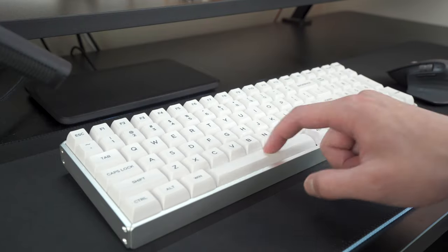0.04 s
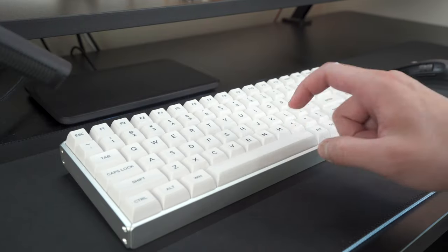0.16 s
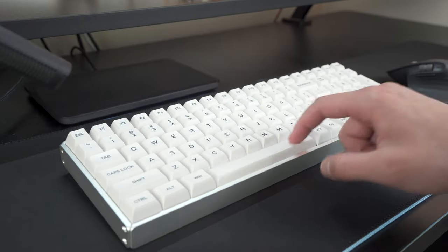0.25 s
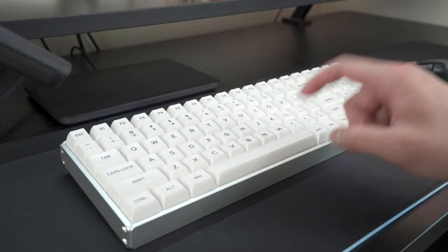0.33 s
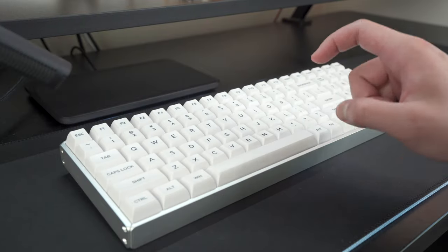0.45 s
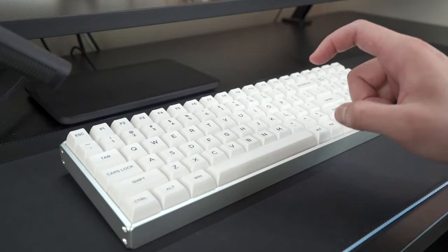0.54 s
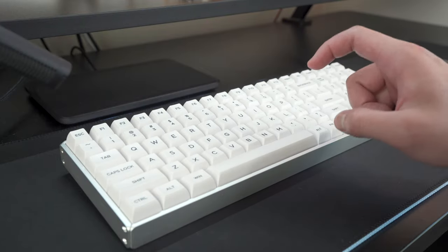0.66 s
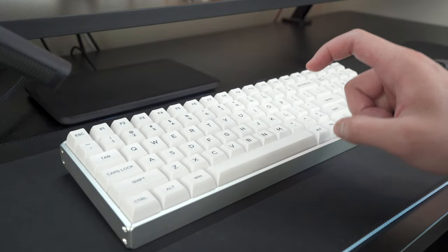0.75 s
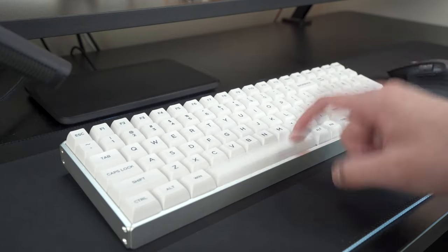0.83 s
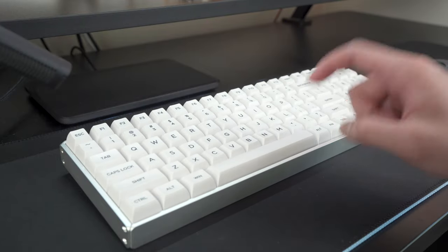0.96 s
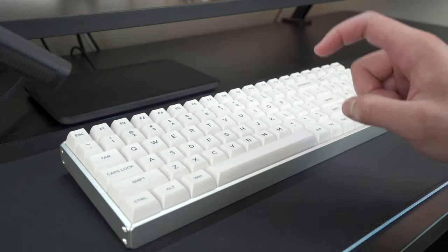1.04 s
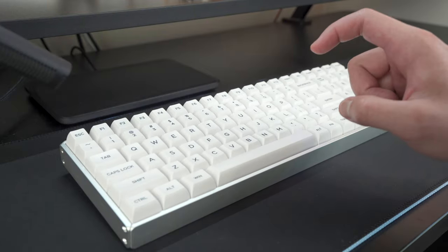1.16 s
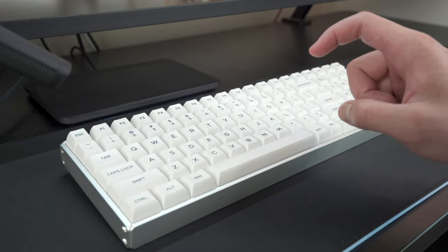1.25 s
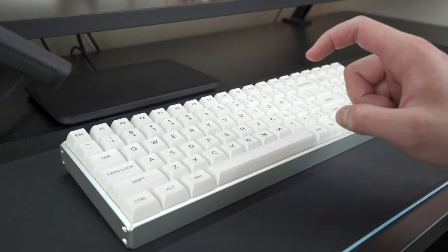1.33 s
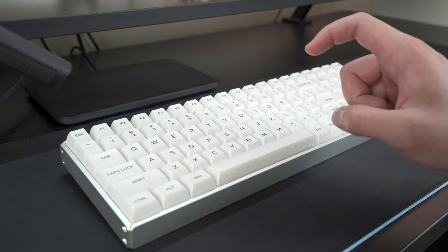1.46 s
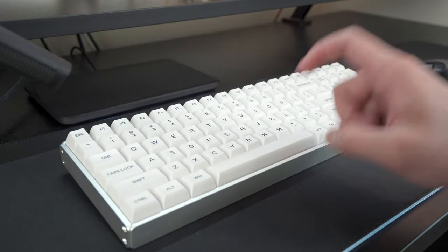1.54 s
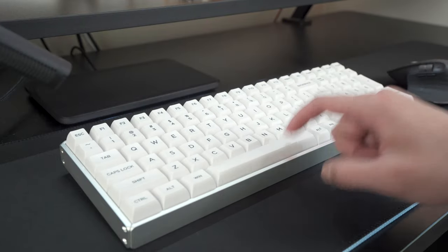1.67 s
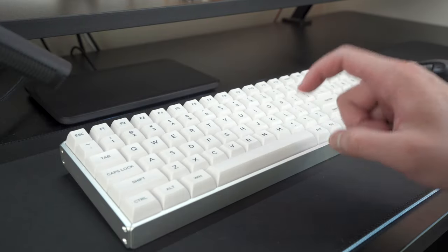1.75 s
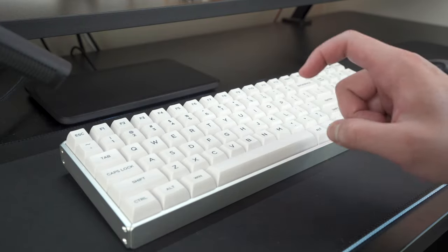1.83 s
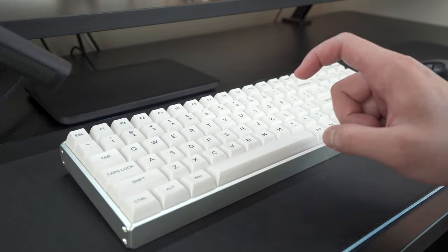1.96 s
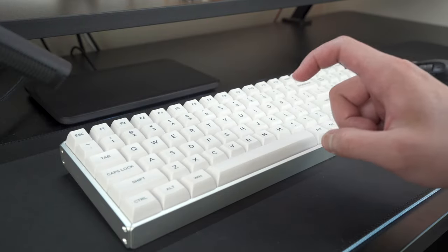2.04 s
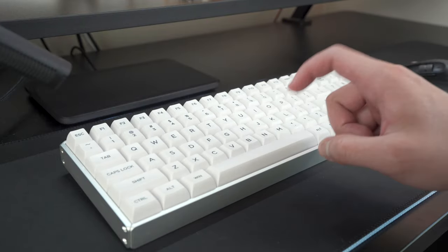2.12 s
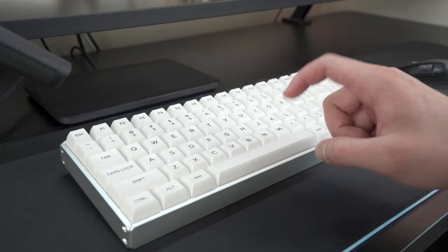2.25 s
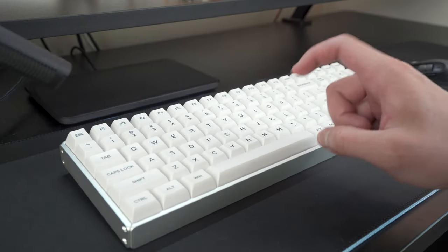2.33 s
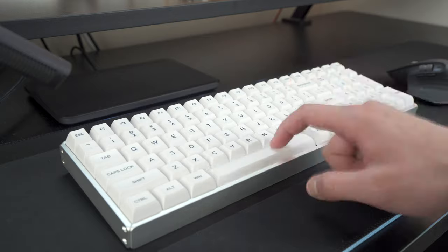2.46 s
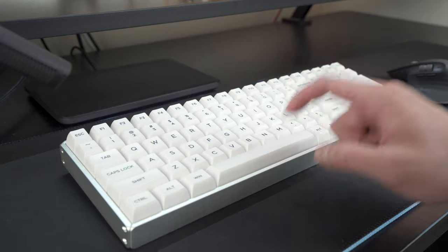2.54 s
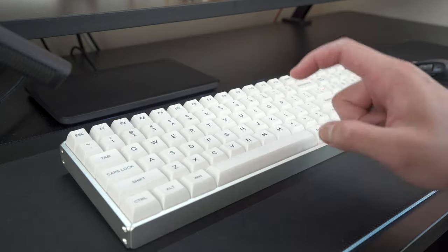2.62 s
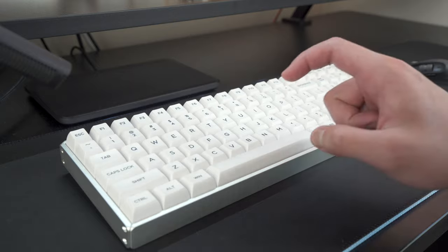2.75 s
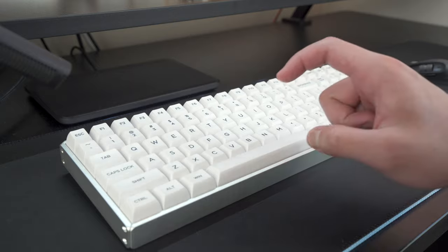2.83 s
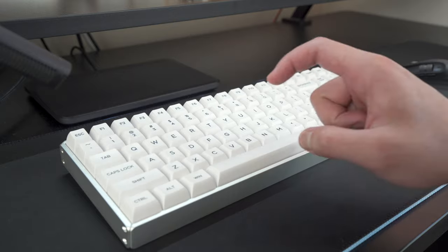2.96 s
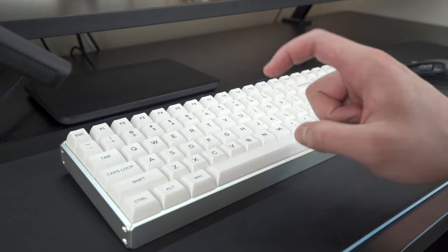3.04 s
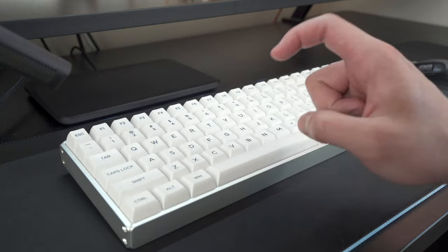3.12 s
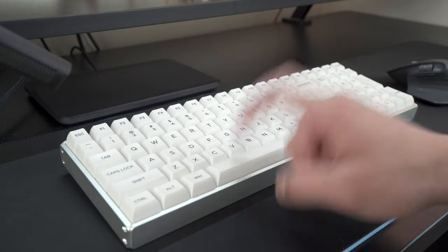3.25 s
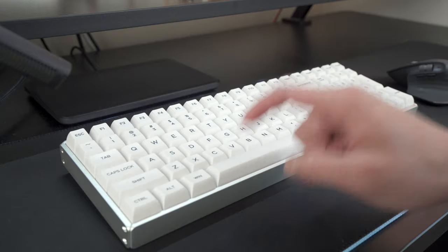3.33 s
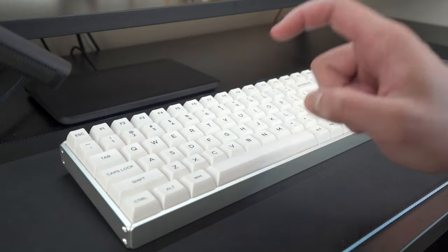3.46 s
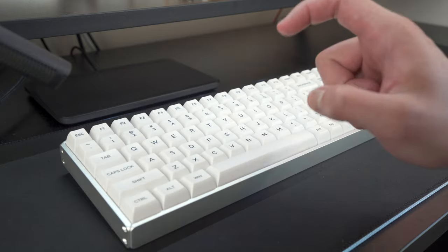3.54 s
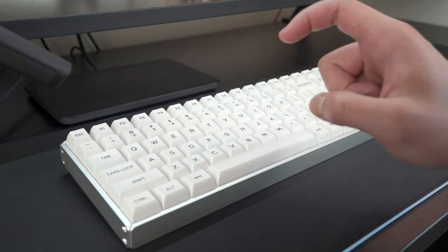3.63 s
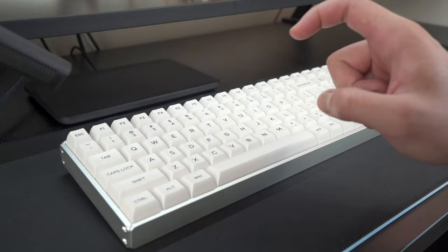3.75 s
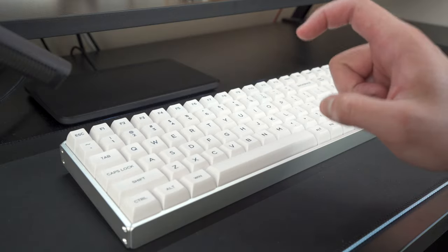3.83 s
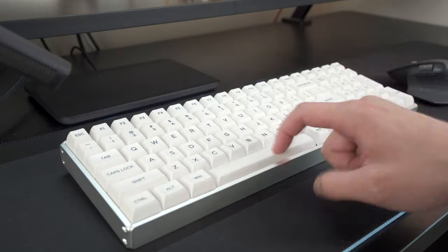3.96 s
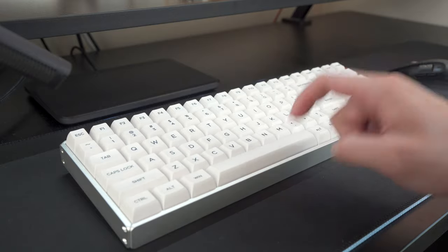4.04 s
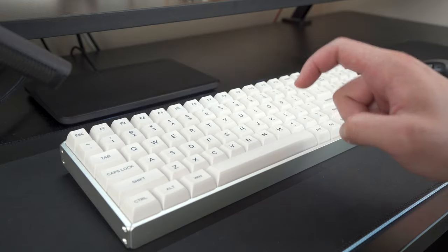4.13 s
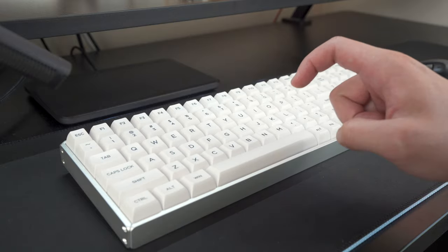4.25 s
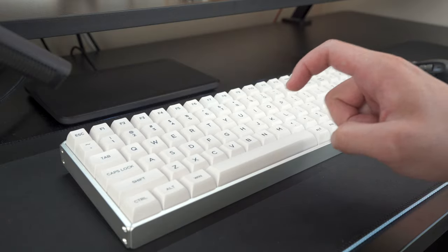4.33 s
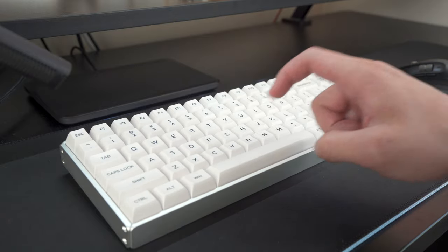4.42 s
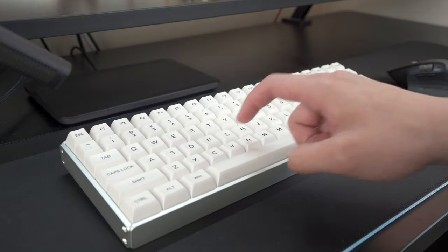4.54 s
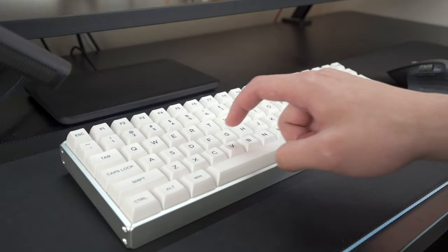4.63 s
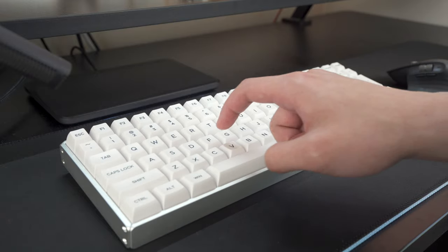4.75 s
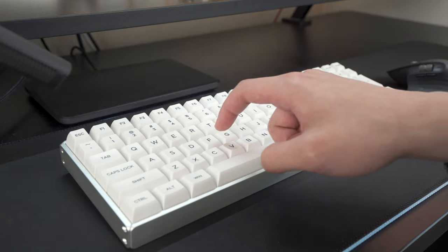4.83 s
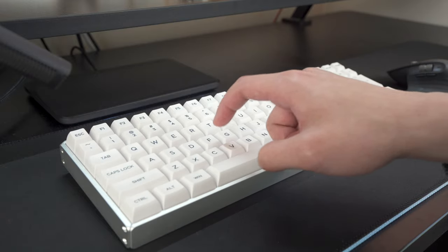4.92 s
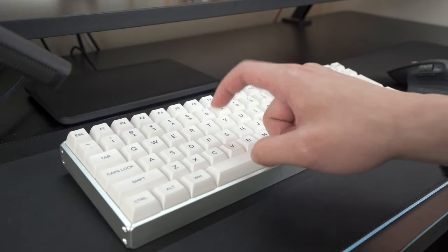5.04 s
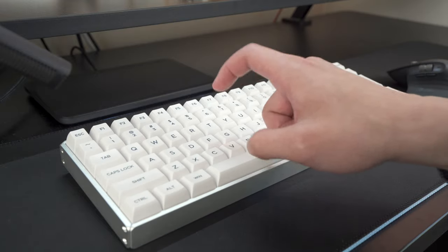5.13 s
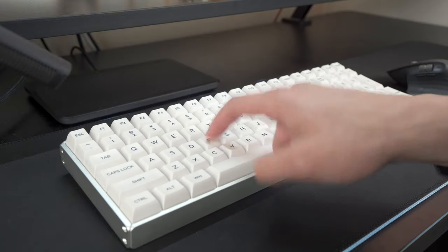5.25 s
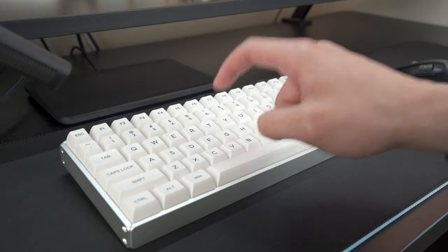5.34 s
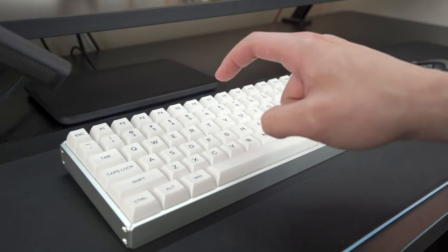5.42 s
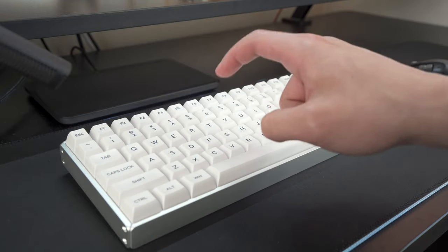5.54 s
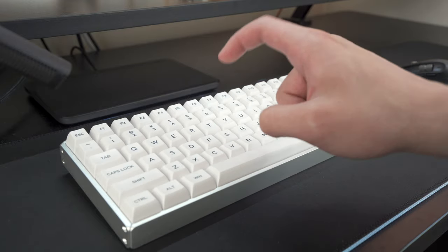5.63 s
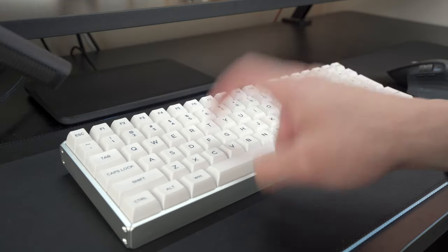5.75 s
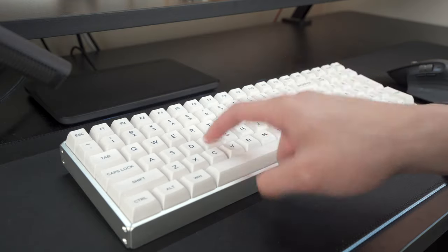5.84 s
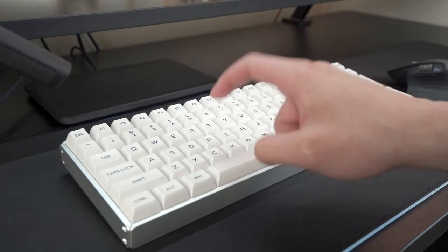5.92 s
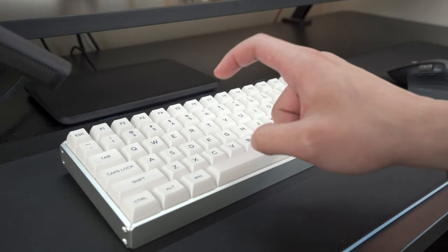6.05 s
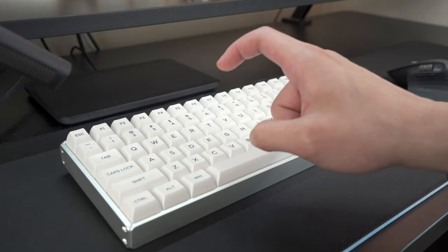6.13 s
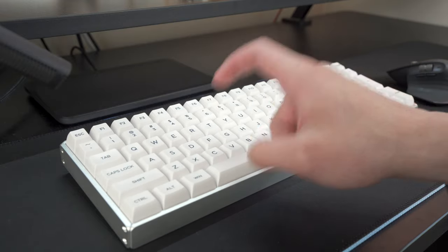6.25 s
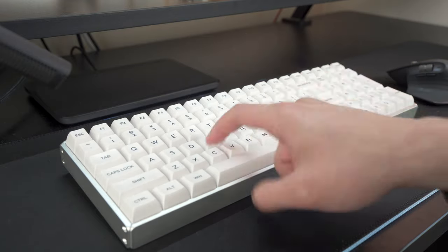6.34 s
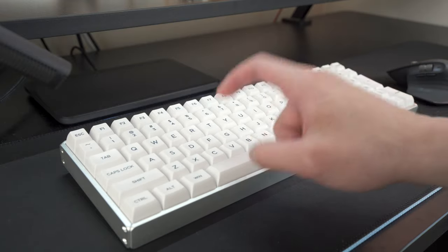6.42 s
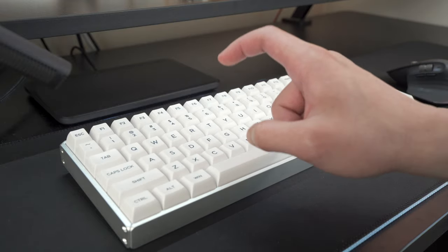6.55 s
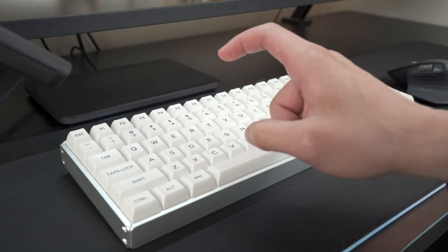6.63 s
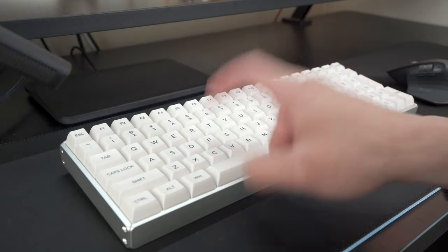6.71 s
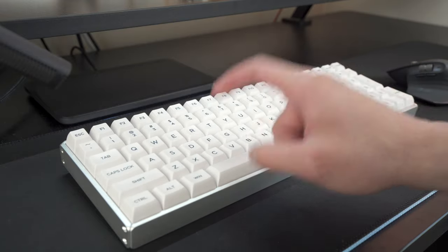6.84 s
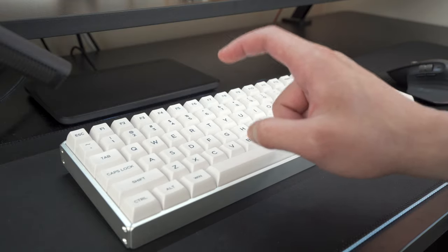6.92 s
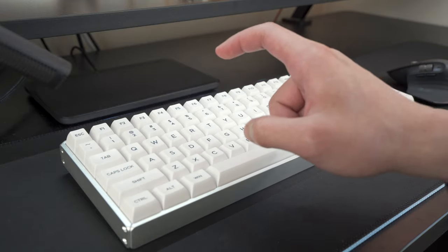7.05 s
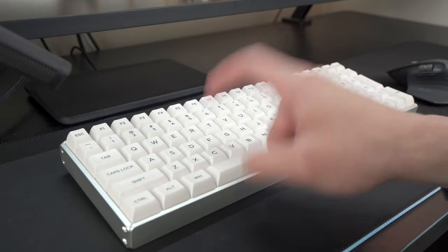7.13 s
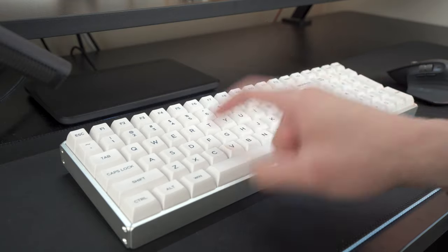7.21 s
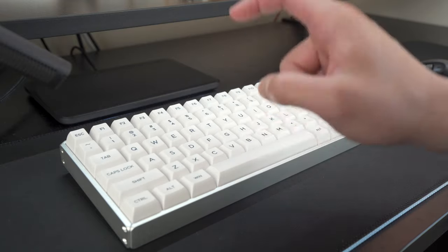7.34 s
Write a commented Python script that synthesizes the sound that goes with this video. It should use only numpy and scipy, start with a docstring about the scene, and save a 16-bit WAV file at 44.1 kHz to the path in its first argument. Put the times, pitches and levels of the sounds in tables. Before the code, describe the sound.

Close to the microphone, a mechanical keyboard's space bar clacks loudly, twice in quick succession and then five more times at a slow, even pace, rattling briefly on each return. After a short gap come five lighter, crisper letter key clicks, each slightly different in pitch. The strokes thud softly through the desk and leave a faint metallic ring over the low air of a small, quiet room.

```python
"""A space bar clacks close to the microphone, again and again; then come five letter keys.
One finger plays a mechanical keyboard on a desk in a small, quiet room. Each stroke is a fingertip tap,
a hard landing that shakes the desk, and a lighter clack as the spring throws the cap back.
Springs and metal case ring faintly over the room air. The loudest landings clip flat at full scale."""
import sys
import numpy as np
from scipy import signal
from scipy.fft import rfft, irfft
from scipy.io import wavfile

SR = 44100
rng = np.random.default_rng(int(sys.argv[2]) if len(sys.argv) > 2 else 0)


def waveform_to_disk(signal):
    """Save audio, clipped to [-1, 1], as 16-bit WAV at the path in sys.argv[1]."""
    frames = np.transpose(np.atleast_2d(signal))
    scaled = np.clip(frames, -1, 1) * 32767
    samples = np.round(scaled).astype(np.int16)
    wavfile.write(sys.argv[1], SR, samples)


N = 325458
LEAD_S = .05  # the first stroke lands just before time zero and is still ringing
SIZE = N + int(LEAD_S * SR)

# Room tone. Each row: frequency in Hz, relative spectral level in dB.
AIR_SPECTRUM = [(25, -5), (75, 0.5), (120, -6.5), (200, -10.5), (570, -12.5), (800, -16), (1700, -16),
                (2500, -19), (3800, -26.5), (4800, -27), (6000, -33), (8000, -40), (10500, -40),
                (15500, -40.5)]
# Faint hum in the room. Each row: centre in Hz, level in dB, width in Hz.
HUM_BANDS = [(80, -64, 13), (548, -69, 14), (594, -73, 14), (1217, -74.5, 14), (1250, -79, 16)]
# The small room's tail. Each row: band centre in Hz, relative level in dB, t60 in seconds.
ROOM_DECAY = [(150, -3.5, 0.42), (600, 6, 0.29), (1740, 1, 0.41), (2130, -4, 0.26), (2700, 0.5, .3),
              (5000, -6, 0.35), (9000, -6, .26), (14000, -3.5, 0.19)]

# Low thuds of desk and fingertip, long rings of metal case and springs.
# Each row: frequency in Hz, relative level in dB, t60 in seconds.
DESK_MODES = [(53.7, -16.5, 0.18), (43.5, -28, 0.63), (81.5, -30.5, 0.12), (144, -44, 0.087)]
FINGER_PAD_MODES = [(123, -22.5, 0.027), (201, -33.5, 0.027)]
CASE_MODES = [(560, -56.5, 1.6), (1215, -64, 4), (1730, -51, 1.1), (1860, -60.5, 1.2), (2250, -64, 0.67),
              (4500, -68, 0.91)]
SPACE_SPRING_MODES = [(266, -36.5, 0.43), (588, -48.5, 1.5), (1613, -52, 1.4), (1670, -52, .6)]
KEY_SPRING_MODES = [(8100, -57, .3), (8600, -58, .28), (9345, -54, 0.28), (9620, -57, .32)]

# Clear modes of the long cap and of a small cap in the plate.
# Each row: frequency in Hz, relative level in dB on landing, the same on return, t60 in seconds.
SPACE_CAP_MODES = [(491, -9.5, -20.5, 0.042), (621.8, -15, -27.5, .045), (1142, -22, -28, 0.062),
                   (1364, -14.5, -20.5, 0.039), (1550, -16, -25, 0.046), (1630, -22, -25.5, 0.044),
                   (1928, -3.5, -27, 0.036), (2064, -7.5, -16, 0.054), (2142, -24, -13.5, .062),
                   (2830, -14.5, -34.5, 0.051), (4030, -18, -23, 0.034), (4940, -14, -29.5, .03),
                   (7960, -18, -14, .012)]
KEY_CAP_MODES = [(521, -28, -42, 0.064), (718, -24.5, -23.5, 0.026), (1092, -22, -24, 0.052),
                 (1256, -28, -34, .04), (1712, -13, -39, 0.038), (2060, -12.5, -27, 0.027),
                 (4330, -12.5, -34, 0.02), (5025, -3.5, -34, 0.011), (8240, -12, -8.5, 0.011)]
# Crowded modes of each contact, heard as bands of noise.
# Each row: centre in Hz, relative snap level in dB, relative ring level in dB, ring t60 in seconds.
SPACE_LANDING_BANDS = [(130, -28, -26, 0.062), (350, -30.5, -29, 0.034), (900, -26.5, -29.5, 0.062),
                       (1500, -13.5, -12.5, 0.051), (3020, -21, -16, 0.044), (5100, -10, -13, .04),
                       (8560, -11.5, -15, .03), (14000, -14, -17, 0.03)]
SPACE_RETURN_BANDS = [(130, -38, -31.5, 0.2), (350, -30, -37.5, .05), (915, -28.5, -36.5, 0.14),
                      (1500, -22.5, -22, 0.052), (3000, -21.5, -29, 0.071), (5250, -24, -30, 0.042),
                      (8100, -7.5, -15, 0.013), (10350, -9.5, -30.5, .022), (11700, -26, -39.5, 0.021),
                      (15000, -24.5, -35.5, .025)]
KEY_LANDING_BANDS = [(130, -26, -24, 0.06), (350, -25.5, -39.5, 0.055), (880, -26, -24, .05),
                     (1646, -12.5, -14.5, 0.035), (2510, -14, -22.5, 0.061), (3400, -14.5, -30, 0.062),
                     (4890, -2, -19.5, 0.041), (6300, -16, -27, .04), (8200, 2.5, -27, 0.053),
                     (11060, -16.5, -31.5, 0.033), (14500, -12.5, -24, .04)]
KEY_RETURN_BANDS = [(129.8, -44, -36, 0.048), (400, -48.5, -49, 0.055), (840, -33.5, -35, 0.082),
                    (1700, -32, -33, 0.069), (3830, -15, -22.5, 0.025), (6300, -29, -29, 0.046),
                    (8160, -16.5, -42.5, 0.038), (11700, -37, -41, 0.052), (14000, -17.5, -37, .03)]

# The space bar lands. Each row: time in seconds, force in dB, pitch factor.
SPACE_PRESSES = [(-.024, -5.5, 1.18), (0.1828, -5.5, 1.04), (0.7921, 1, 1.014), (1.5534, 1.5, 1.04),
                 (2.4092, 1, 1.0), (3.2276, -2, 1.015), (3.895, 1.5, 0.99)]
# A letter key lands. Each row: time in seconds, force in dB, pitch factor, brightness in dB per octave.
KEY_PRESSES = [(5.1539, -2, 0.99, 1), (5.7275, -1.5, 1.22, -0.26), (6.2645, -7.5, 1.02, 1.5),
               (6.6947, -4.5, 0.93, 0), (7.1177, -6.5, 1.02, .5)]
# The caps spring back. Each row: time in seconds, force in dB.
SPACE_RELEASES = [(.0373, -2), (0.2287, -2), (0.8404, 0.5), (1.6125, 0), (2.456, 1), (3.2509, -1.5),
                  (3.9495, 0), (5.1754, -6.5)]
KEY_RELEASES = [(5.2136, -4), (5.7934, -3.5), (6.3044, -4), (6.7283, -3.5), (7.1421, -5.5)]


def amp(db):
    """Decibels to gain."""
    return 10 ** (np.asarray(db) / 20)


def unit(x):
    """Scales to an rms of one."""
    return x / np.sqrt(np.mean(x ** 2) + 1e-20)


def add(mix, s, sound):
    """Mixes a sound in at s seconds."""
    part = mix[int(round((s + LEAD_S) * SR)):][:len(sound)]
    part += sound[:len(part)]


def bands(x, rows):
    """Splits a sound into overlapping bands around each row's centre frequency."""
    log_hz = np.log(np.fft.rfftfreq(len(x), 1 / SR) + 1)
    log_centres = np.log([row[0] for row in rows])
    return [irfft(rfft(x) * np.interp(log_hz, log_centres, pick), len(x)) for pick in np.eye(len(rows))]


def fade(t, t60):
    """Falls by 60 dB in t60 seconds."""
    return np.exp(-np.log(1000) * t / t60)


def burst(noise, envelope):
    """Noise under an envelope, holding exactly the envelope's energy."""
    return unit(noise * envelope) * np.sqrt(np.mean(envelope ** 2))


def ring(modes, size):
    """Struck modes; neighbours start in opposite directions, so the ring takes a moment to swell."""
    t = np.arange(size) / SR
    return sum((-1) ** k * amp(db) * fade(t, t60) * np.sin(2 * np.pi * hz * t)
               for k, (hz, db, t60) in enumerate(modes))


def room_tone(air_db):
    """Steady air behind the keyboard, with narrow bands of noise that make a wavering hum."""
    hz = np.fft.rfftfreq(N, 1 / SR)
    points_hz, points_db = np.transpose(AIR_SPECTRUM)
    air_shape = amp(np.interp(np.log(hz + 1), np.log(points_hz), points_db))
    hum_shape = sum(amp(db) * unit(1 / (1 + (2 * (hz - centre) / width) ** 2))
                    for centre, db, width in HUM_BANDS)
    air = irfft(rfft(rng.standard_normal(N)) * air_shape, N)
    hum = irfft(rfft(rng.standard_normal(N)) * hum_shape, N)
    return amp(air_db) * unit(air) + hum


def reflections(x, wet_db, build_s):
    """The near walls send back dense echoes, each band dying at its own speed."""
    t = np.arange(SR) / SR
    parts = bands(rng.standard_normal(SR), ROOM_DECAY)
    tail = sum(amp(db) * fade(t, t60) * part for part, (_, db, t60) in zip(parts, ROOM_DECAY))
    tail *= 1 - np.exp(-(t / build_s) ** 2)
    return amp(wet_db) * signal.fftconvolve(x, tail / np.linalg.norm(tail))[:SIZE]


def key_springs(spread):
    """Each letter key's spring pings faintly at its own pitch."""
    out = np.zeros(SIZE)
    for s, force_db, _, _ in KEY_PRESSES:
        pitch = 1 + spread * rng.uniform(-1, 1)
        tuned = [(hz * pitch, db, t60) for hz, db, t60 in KEY_SPRING_MODES]
        add(out, s, amp(force_db / 2) * ring(tuned, size=SR))
    return out


def desk_and_case(strokes, case_db, pad_db, spring_modes=()):
    """The finger pad thuds; the landing rocks the desk and rings the case and any spring given."""
    out = np.zeros(SIZE)
    desk, pad = ring(DESK_MODES, 2 * SR), ring(FINGER_PAD_MODES, 2 * SR)
    metal = amp(case_db) * ring(CASE_MODES, 2 * SR) + ring(spring_modes, 2 * SR)
    for s, force_db, _, _, travel_s, thump_db in strokes:
        add(out, s - travel_s, amp(thump_db + pad_db) * pad)
        add(out, s + .003, amp(thump_db) * desk)  # the desk answers 3 ms late
        add(out, s, amp(force_db / 2) * metal)
    return out


def desk_recoil(kick_db, lag_s):
    """The returning space bar jerks the desk the other way, so the thud shudders."""
    out, desk = np.zeros(SIZE), ring(DESK_MODES, size=SR)
    for s, force_db in SPACE_RELEASES:
        add(out, s + lag_s, -amp(force_db + kick_db) * desk)
    return out


def clack(contact, modes, grain, snap_s, tilt_db):
    """Plastic hits, heard close: a snap, a dense short ring and clear modes. The grain is the cap's own."""
    t = np.arange(len(grain)) / SR
    noise = grain + .6 * rng.standard_normal(len(t))
    attack = 1 - np.exp(-t / .00006)
    sound = ring(modes, size=len(t))
    for band, (_, snap_db, ring_db, t60) in zip(bands(noise, contact), contact):
        snap = amp(snap_db) * np.exp(-(t / snap_s) ** 2)
        sound += burst(band, (snap + amp(ring_db) * fade(t, t60)) * attack)
    hz = np.fft.rfftfreq(2 * len(t), 1 / SR)
    octaves = np.log2(np.maximum(hz, 300) / 3000)  # brightness: tilt_db per octave about 3 kHz
    return irfft(rfft(sound, 2 * len(t)) * amp(tilt_db * octaves))[:len(t)]


def returns(releases, contact, modes, flight_s, tilt_db, snap_s, rebound_db, rebound_modes_db, touch_db):
    """The spring throws the cap against its top stop; it rebounds twice, each time sooner and softer."""
    out, grain = np.zeros(SIZE), rng.standard_normal(6000)
    t = np.arange(len(grain)) / SR
    usual_db = np.median([force_db for _, force_db in releases])
    for s, force_db in releases:
        gap_s = flight_s * np.cbrt(amp(force_db - usual_db))  # a harder return flies longer
        for k in range(3):
            struck = [(hz, db + k * rebound_modes_db, t60) for hz, _, db, t60 in modes]
            hit = clack(contact, struck, grain, snap_s, tilt_db)
            # from the next touch on, the remaining ring shifts by touch_db
            touch = np.interp(t, [gap_s, gap_s + .0045], [1, amp(touch_db)])
            add(out, s, amp(force_db + k * rebound_db) * touch * hit)
            s += gap_s
            gap_s *= .55
    return out


def travel(click, length_s, tap_db, slide_db, bump_db):
    """On the way down the fingertip taps the cap; the stem slides and ticks over the switch leaf."""
    steps = max(int(length_s * SR), 8)
    friction = rng.standard_normal(1024)[:steps] / np.sqrt(steps)
    push = amp(slide_db) * friction * np.linspace(0, 1, steps)
    push[0] += amp(tap_db)
    push[int(steps * .55)] += amp(bump_db)
    return signal.fftconvolve(click, push)


def landings(strokes, contact, modes, snap_s, tap_db, slide_db, bump_db):
    """The cap runs down and hits the plate."""
    out, grain = np.zeros(SIZE), rng.standard_normal(6000)
    for s, force_db, pitch, tilt_db, travel_s, _ in strokes:
        tuned = [(hz * pitch, db, t60) for hz, db, _, t60 in modes]
        add(out, s, amp(force_db) * clack(contact, tuned, grain, snap_s, tilt_db))
        click = clack(contact, [], grain, snap_s, tilt_db)
        add(out, s - travel_s, travel(click, travel_s, tap_db, slide_db, bump_db))
    return out


def stroke(s, force_db, pitch, tilt_db, base_travel_s, hurry, base_thump_db):
    """A harder stroke gets down sooner and thumps the desk more."""
    travel_s = base_travel_s / amp(hurry * force_db)  # hurry: dB of cap speed per dB of force
    thump_db = base_thump_db + .88 * force_db
    return s, force_db, pitch, tilt_db, travel_s, thump_db


def letter_keys(strokes):
    """Small caps click down, each with its own colour, and spring back with quick, faint rebounds."""
    down = landings(strokes, KEY_LANDING_BANDS, KEY_CAP_MODES,
                    snap_s=.00096, tap_db=-32, slide_db=-18, bump_db=-24.5)
    up = returns(KEY_RELEASES, KEY_RETURN_BANDS, KEY_CAP_MODES, flight_s=.0056, tilt_db=.4,
                 snap_s=.0013, rebound_db=-19.5, rebound_modes_db=-1, touch_db=3)
    return down + up


def space_bar(strokes):
    """The long cap lands hard and rattles back up, each touch damping the one before."""
    down = landings(strokes, SPACE_LANDING_BANDS, SPACE_CAP_MODES,
                    snap_s=.0018, tap_db=-26.5, slide_db=-15.5, bump_db=-26)
    up = returns(SPACE_RELEASES, SPACE_RETURN_BANDS, SPACE_CAP_MODES, flight_s=.015, tilt_db=.1,
                 snap_s=.00042, rebound_db=-10.5, rebound_modes_db=1.5, touch_db=-7.5)
    return down + up


def scene():
    """One microphone close to the keyboard, the desk beneath it and the room well behind."""
    # always the same long cap, so its brightness follows the force alone
    space_strokes = [stroke(s, db, pitch, tilt_db=.05 * db, base_travel_s=.0058, hurry=.58,
                            base_thump_db=2.1) for s, db, pitch in SPACE_PRESSES]
    key_strokes = [stroke(*row, base_travel_s=.0046, hurry=.09, base_thump_db=1) for row in KEY_PRESSES]
    space, keys = space_bar(space_strokes), letter_keys(key_strokes)
    echoes = reflections(space, wet_db=-22, build_s=.0043) + reflections(keys, wet_db=-22.5, build_s=.006)
    air = room_tone(air_db=-54)
    body = desk_and_case(space_strokes, case_db=-1.5, pad_db=0, spring_modes=SPACE_SPRING_MODES)
    body += desk_and_case(key_strokes, case_db=1.5, pad_db=1)
    body += desk_recoil(kick_db=-12.5, lag_s=.0014) + key_springs(spread=.025)
    return ((space + keys + echoes + body)[-N:] + air)[None]


def record(dry):
    """The loudest landings clip flat at full scale; the treble ends just under 16 kHz."""
    clipped = np.clip(dry, -1, 1)
    lowpass = signal.firwin(255, 15950, window=("kaiser", 8), fs=SR)
    return signal.oaconvolve(clipped, lowpass[None], "same")


dry = scene()
out = record(dry)
waveform_to_disk(out)
```